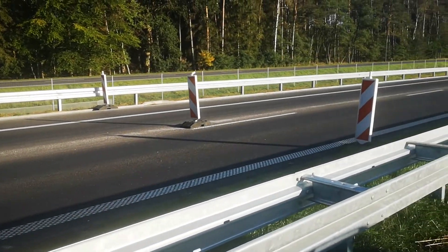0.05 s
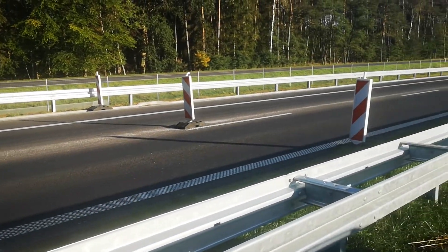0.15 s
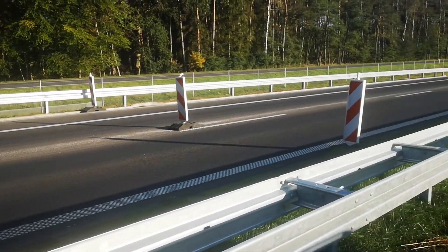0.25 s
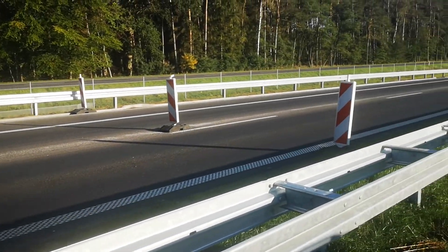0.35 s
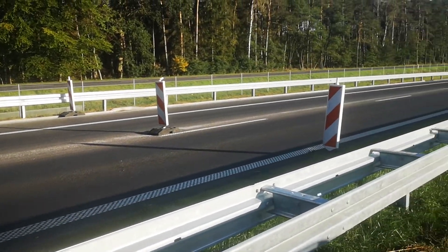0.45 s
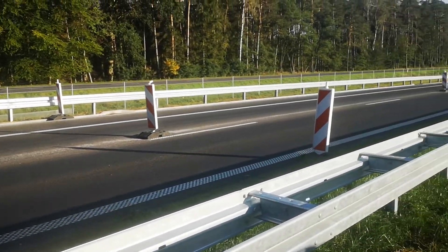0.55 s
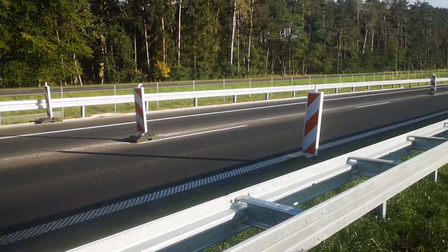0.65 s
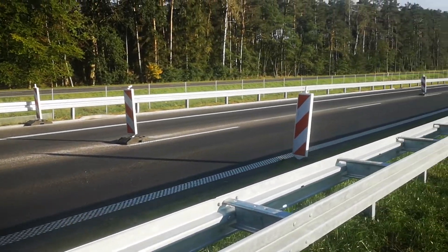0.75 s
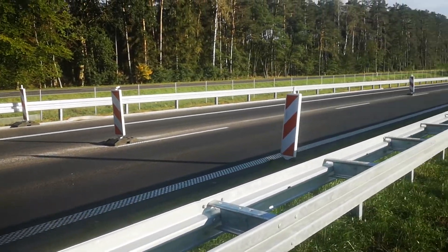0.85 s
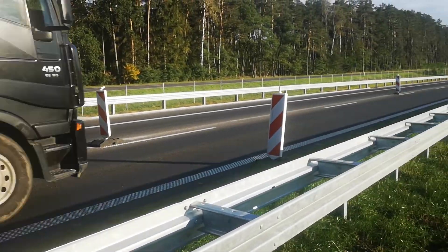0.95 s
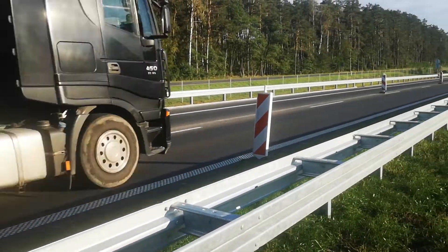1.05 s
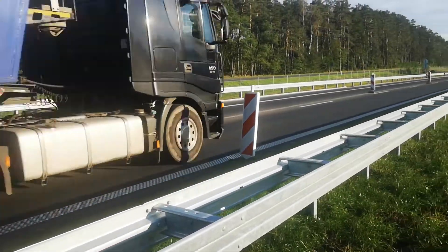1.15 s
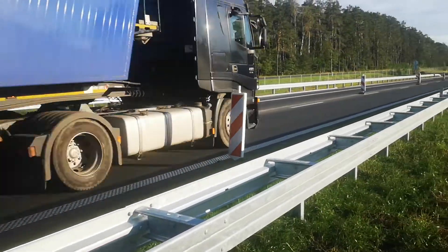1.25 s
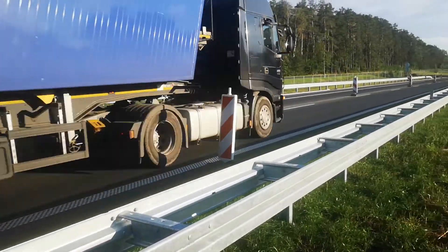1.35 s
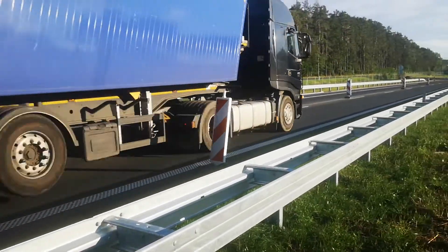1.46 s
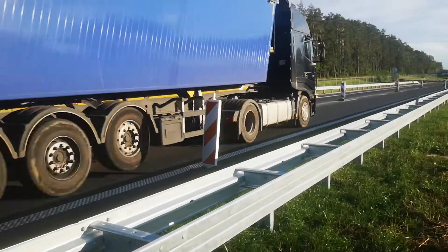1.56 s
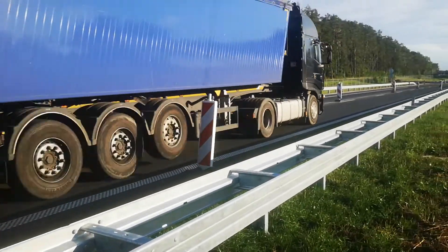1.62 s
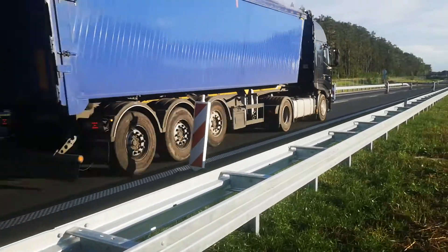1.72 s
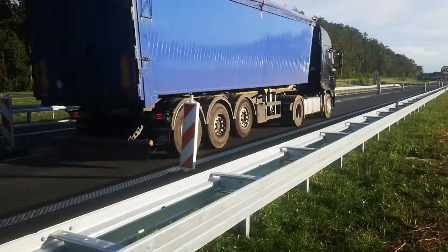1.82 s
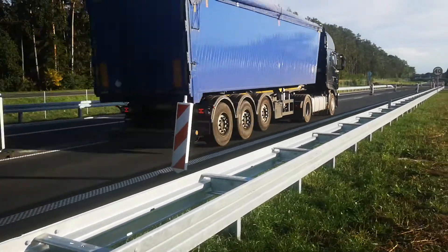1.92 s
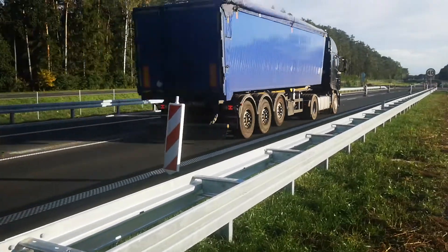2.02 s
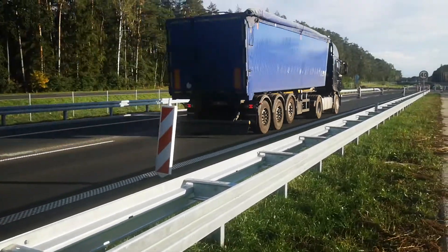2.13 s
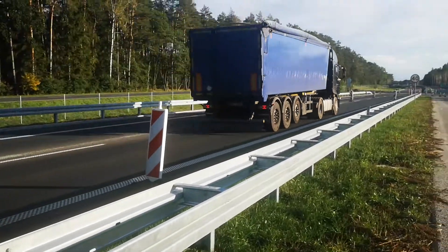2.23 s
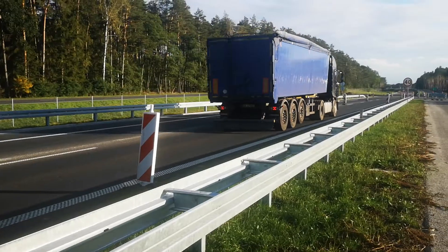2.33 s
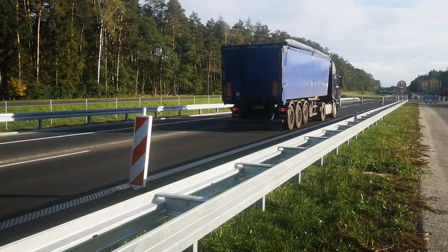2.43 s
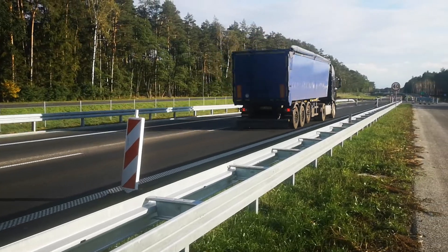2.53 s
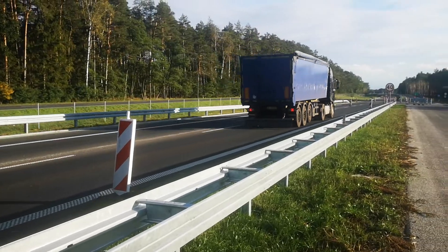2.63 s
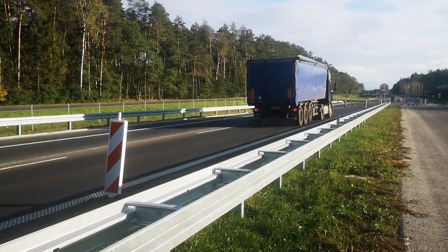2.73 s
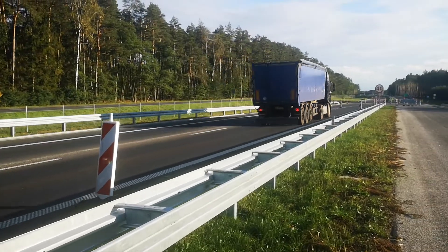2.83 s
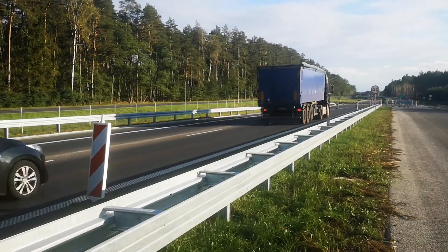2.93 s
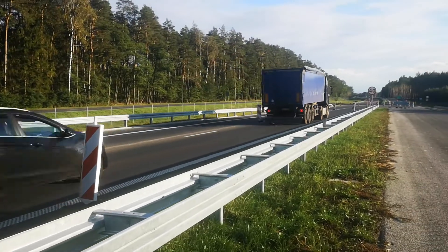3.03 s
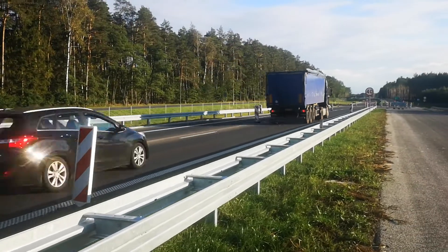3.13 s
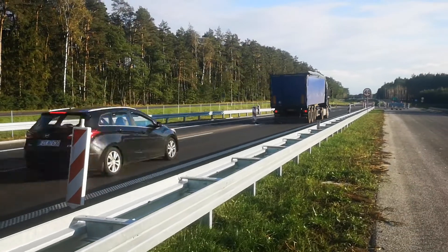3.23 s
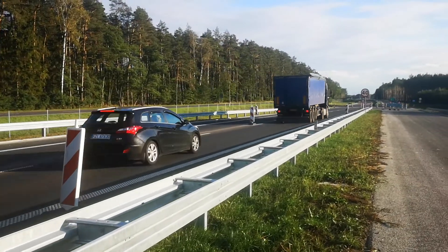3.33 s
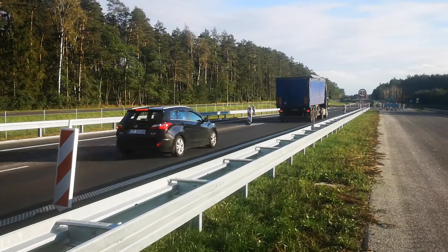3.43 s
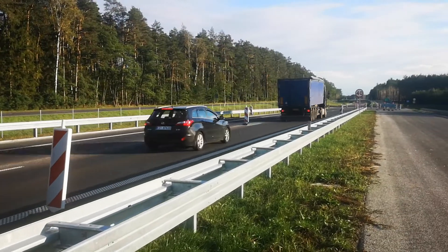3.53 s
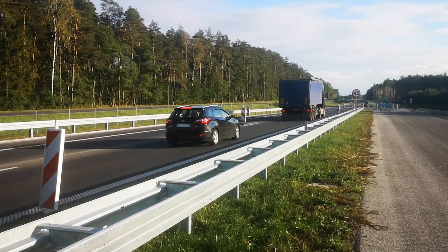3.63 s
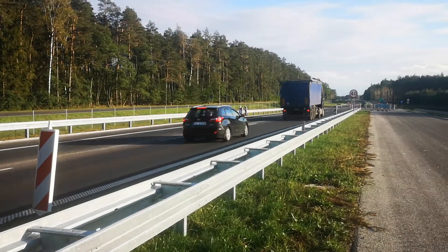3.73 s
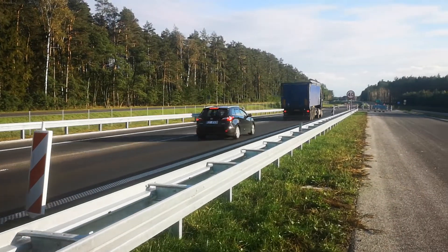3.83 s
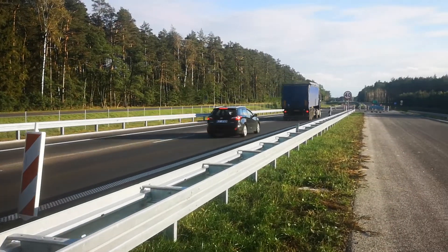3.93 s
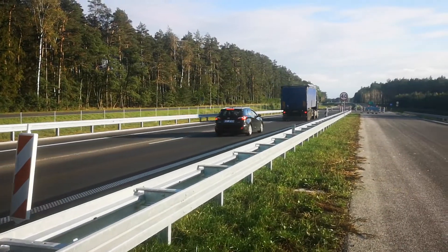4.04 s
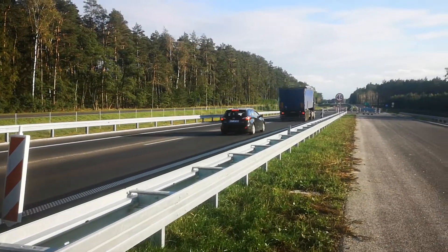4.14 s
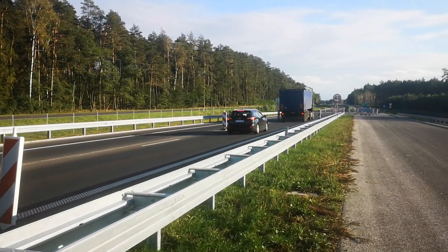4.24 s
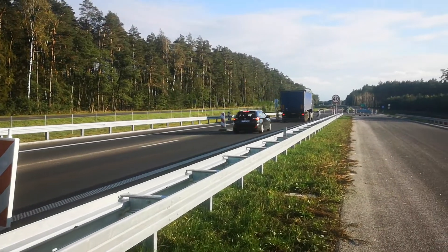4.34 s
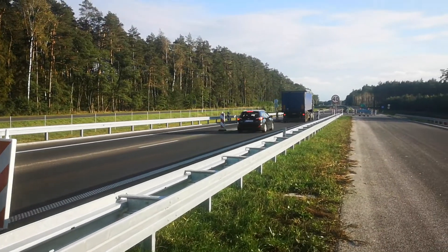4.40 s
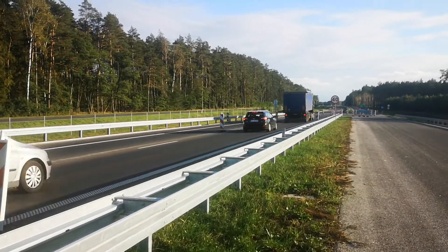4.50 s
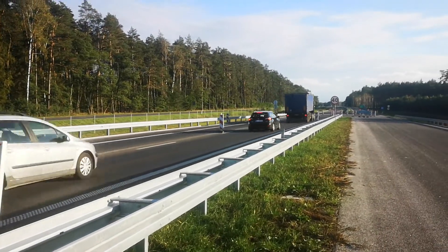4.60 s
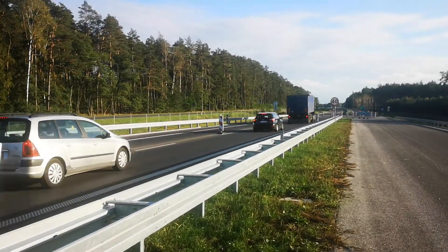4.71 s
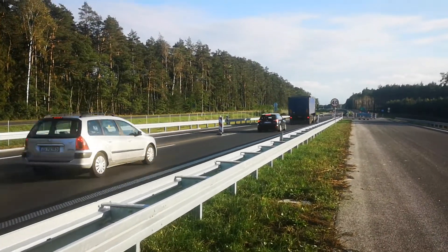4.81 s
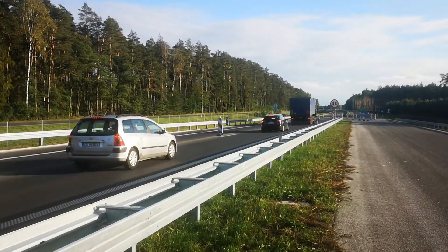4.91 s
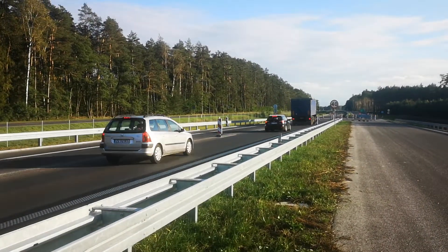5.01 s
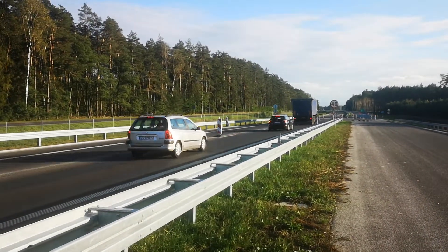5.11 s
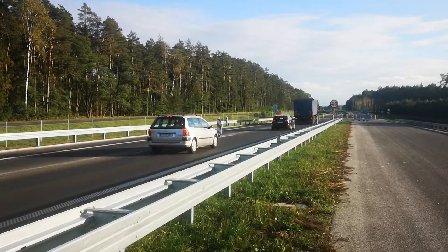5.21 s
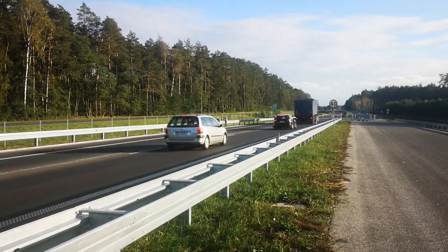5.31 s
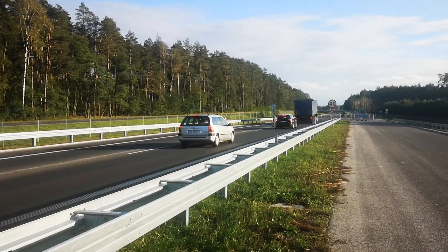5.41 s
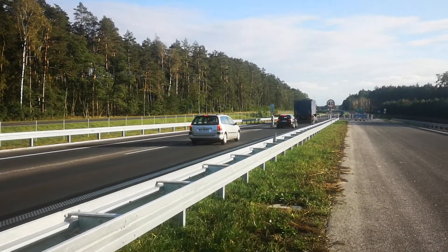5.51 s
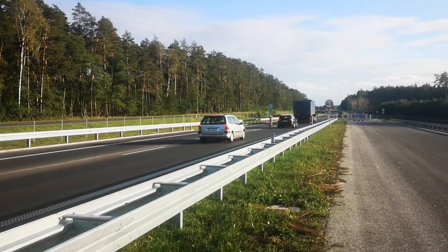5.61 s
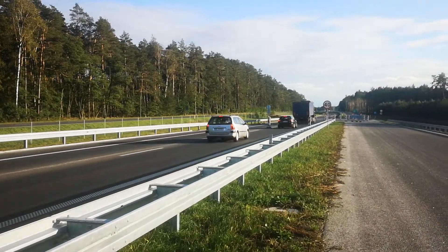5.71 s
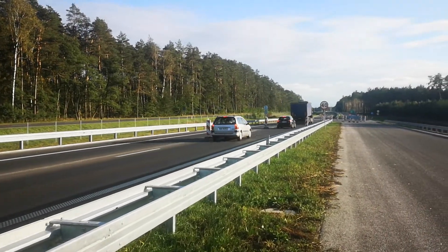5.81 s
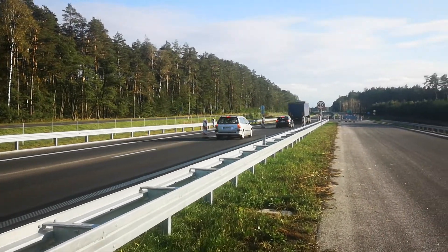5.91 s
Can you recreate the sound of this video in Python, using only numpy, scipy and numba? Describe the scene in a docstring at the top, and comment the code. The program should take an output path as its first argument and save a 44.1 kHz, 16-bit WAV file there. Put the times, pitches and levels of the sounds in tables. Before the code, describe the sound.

Roadside traffic passing left to right: a heavy lorry first, then two quicker car whooshes, over a distant wash of road noise.

```python
"""First comes the roar of a lorry drawing near on an expressway, over the wash of traffic far down the road.
The lorry and two cars pass left to right and one more draws near, a few metres from a hand-held phone
behind the crash barrier. Tyres are shaped noise that falls in pitch as they pass; engines drone in
wavering tones, a turbo whistles, and the forest edge scatters the passing sounds back as fading noise.
Each microphone port rings in certain directions; the hand ticks and rustles on the case."""
import sys
import numpy as np
from scipy import signal
from scipy.fft import rfft, irfft, next_fast_len
from scipy.io import wavfile
from scipy.ndimage import uniform_filter1d, map_coordinates
from numba import njit

SR = 44100
rng = np.random.default_rng(int(sys.argv[2]) if len(sys.argv) > 2 else 0)


def persist_wave(psi):
    """Save psi, clipped to +-1, as 16-bit WAV."""
    counts = np.round(np.clip(psi, -1, 1) * 32767).astype(np.int16)
    wavfile.write(sys.argv[1], SR, np.atleast_2d(counts).T)


N = 262836
T = np.arange(N) / SR  # time, s
SOUND_SPEED = 343  # m/s

# traffic far down the road, relative colour at each port: (f/Hz, left level/dB, right level/dB)
FAR_COLOUR = [(450, -50, -47), (615, -22.5, -11.5), (957, -6, 0), (1170, -10, -17.5), (1580, -12, 4),
              (1900, -15, -4.5), (2190, -5, 2.5), (2510, -14.5, -17), (5050, -31, -72), (7660, -33, -26),
              (8850, -54, -40), (14000, -52, -45.5)]
FAR_DB, FAR_LEAD_MS = -36, 0.18
FAR_ALIKE = 0.51  # share of the power common to both ports

# wheel sets and the lorry's engine block: (abreast t/s, speed/(m/s), lane distance/m,
# plain roar level at 1 m/dB, level tilt from front to behind/dB, hump f/Hz, hump width/share of f,
# hump level/dB, hiss level/dB)
WHEELS = [(.86, 22, 7, -16.5, 1, 860, 0.44, 2.5, 6), (.95, 22, 7, -24.5, -4, 384, 0.43, 22, 3),
          (1.12, 22, 7, -17, 0, 658, 0.16, 14, -4.5), (1.5, 21, 7, -16, 0.5, 807, 0.2, 10.5, -4.5),
          (2.75, 22, 6.5, -18, -1, 2180, 0.4, 5.5, 2), (4.24, 21, 6.5, -16, -2, 2280, 0.1, -17.5, 0),
          (6.7, 21, 7, -19, 9, 1960, 0.39, 7, -8)]
# colour of tyre roar before hump and hiss are set: (f/Hz, level/dB)
TYRE_COLOUR = [(150, -40), (300, -12), (450, -4.5), (700, -4.5), (1000, -1), (2000, -2.5), (3200, -7),
               (5000, -14), (8000, -19), (16000, -38)]
# share of a roar's power that differs from port to port: (f/Hz, share/0-1)
PORT_SPREAD = [(600, 0), (1200, 0.17), (2000, 0.03), (4000, 0.83), (8000, 1)]
AIR_HZ_M = 143000  # treble edge times distance
SHADE_DB = -3  # shift of that edge by the time a vehicle is straight behind

# ports on the phone: the left one hears passing sounds first, most so from the lead bearing
LEAD_MS, LEAD_SWING_MS, LEAD_BEARING_DEG = .24, 0.23, -41.5

# body, exhaust and road rumble of each vehicle:
# (boom and deep loudest t/s, boom level/dB, growl level/dB, deep level/dB)
RUMBLES = [(.7, -30.5, -33.5, -33.5), (2.8, -44, -41.5, -33.5), (4.35, -47.5, -41, -33)]
# loss per doubled distance: (boom/dB, growl/dB, deep/dB)
RUMBLE_FALL_DB = [3, 4.5, 4]
GROWL_LAG_S = 0.38  # the exhaust passes last
GROWL_LEAD_MS = 0.55  # the left port hears the growl first while its vehicle draws near

# engines: (abreast t/s, firing f/Hz, sag/(Hz per s), firing tone level abreast/dB,
# extra level from behind/dB, loss per doubled distance/dB, level shift of the multiples/dB)
ENGINES = [(1.05, 55.5, 1.1, -34.5, 1.5, 1.6, 3), (2.75, 58.5, 1, -40, -5, 9, -6),
           (4.2, 56.3, 2, -31, -3, 8, -8)]
# multiples of the firing rate: (multiple/count, level before the engine's shift/dB)
MULTIPLES = [(2, -16.5), (3, -15), (4, -12)]
SPEED_M_S, LANE_M = 22, 7  # path of the engines and rumbles

# turbo of the lorry: (abreast t/s, speed/(m/s), lane distance/m, whistle f before Doppler/Hz)
TURBO = (.9, 21, 7, 6730)
# turbo as each port catches it: (t/s, left level at 1 m/dB, right level at 1 m/dB)
WHISTLE = [(0, -33, -31), (.5, -36, -36), (.6, -36, -33), (.82, -34, -47), (.91, -10, -19),
           (1.02, -15, -38), (1.27, -22, -32), (1.33, -50, -50)]
INTAKE_HZ, INTAKE_DB = 9450, -10  # hiss of the air intake, under the whistle

# throb of the trailer's air wake: (strongest t/s, f/Hz, glide/(Hz per s), half length/s, level/dB)
WAKE = (1.2, 27, -10, .33, -29)
# a gust hits both ports: (t/s, f/Hz, half length/s, envelope peak level/dB)
THUD = (4.509, 50, .016, -18)

# ticks of fingers and grit on the case, before it rings: (t/s, level/dB, left minus right level/dB)
TICKS = [(1.1666, -27, 4), (2.032, -27, -12), (3.56, -33, -8), (3.6081, -30, -5), (4.0129, -15.5, -24),
         (5.3364, -40, -11), (5.3953, -41, -15), (5.4164, -43, -21), (5.52, -36, -11), (5.5835, -39, -5)]
# the hand slides on the case: (t/s, level before the split between ports/dB)
SLIDE = [(5.18, -83), (5.224, -56), (5.238, -62), (5.31, -53), (5.318, -44), (5.388, -50), (5.402, -43.5),
         (5.432, -56), (5.444, -50), (5.498, -55), (5.518, -49), (5.564, -54), (5.578, -74), (5.584, -51),
         (5.596, -73), (5.62, -76)]
# full colour of the ringing case: (f/Hz, level/dB)
CASE_COLOUR = [(1200, -18), (2100, -8), (3300, 0), (5500, 2.5), (6700, 3), (7700, 19), (8800, 2.5),
               (12000, -3), (15500, -13)]
TICK_RING, SLIDE_RING = 0.39, 0.77  # shares of the case's dB

FOREST_T60_S, FOREST_DB = 0.91, -6
# port resonances open to one direction: (port/0 left 1 right, f/Hz, glide/(Hz per deg), width/Hz,
# level/dB, bearing/deg, spread before that bearing/deg, spread after it/deg)
LOBES = [(1, 6950, 7, 1140, 13.5, -40, 16.2, 22.7), (1, 2010, 1, 410, 4, -24, 31, 16.4),
         (1, 2640, -20.5, 490, 3, -59, 9.1, 33), (1, 10100, 7, 3100, 3.5, -33, 32, 11),
         (0, 7700, -4, 580, 5.5, 13, 33, 57), (0, 1830, -3, 130, 5.5, -27, 28, 38),
         (0, 1030, -1, 210, -2.5, 25, 18, 34), (1, 1090, -13, 350, -4.5, 25.5, 13, 19),
         (0, 3200, 2, 930, 5, 60, 20, 11), (1, 900, 5, 860, 0, -44, 11.4, 13),
         (1, 3450, 13, 610, -1, 60.5, 17, 10), (0, 560, 0, 1000, -3, -52, 20, 38),
         (1, 5100, 12, 1400, 7, -52, 17, 18), (0, 3700, -3, 360, 2, -47, 9.8, 21)]
# overall colour of the microphone ports: (f/Hz, left level/dB, right level/dB)
PORT_COLOUR = [(308, -5.5, 6), (416, -7, -1), (510, -5.5, -6), (803, 1.5, -1.5), (1330, -4.5, 2),
               (1500, 0.5, 3), (2390, -3.5, 4), (2765, -6, 8), (3430, -10, 0.5), (4540, -9.5, -8.5),
               (5700, -8.5, -1), (7500, -4, 0.5), (8200, -8, -5.5), (10900, -18.5, -8), (15500, -17, -14)]
# how far the left port's phase runs ahead of the plain time lead: (f/Hz, phase/deg)
LEFT_PHASE = [(200, 0), (320, 11), (480, 54), (600, 47), (780, 24), (1100, -29), (1400, -81), (1650, -24),
              (2500, 17), (4000, -3)]
TOP_HZ = 15400


def undb(db):
    """Turn dB into gain."""
    return 10 ** (np.asarray(db) / 20)


def unit(x):
    """Scale a sound to an average (rms) strength of 1."""
    return x / np.sqrt(np.mean(x ** 2))


def colour(x, hz, db, turn=((1, 0), (2, 0))):
    """Shape a spectrum by points joined on a log-frequency axis; turn shifts the phase, as (f/Hz, deg)."""
    size = next_fast_len(len(x))
    log_hz = np.log(np.maximum(np.arange(size // 2 + 1) * SR / size, 1))
    turn_hz, turn_deg = np.transpose(turn)
    phase = np.radians(np.interp(log_hz, np.log(turn_hz), turn_deg))
    gain = undb(np.interp(log_hz, np.log(hz), db))
    return irfft(rfft(x, size) * gain * np.exp(1j * phase), size)[:len(x)]


@njit
def svf(x, hz, damping):
    """State-variable filter with a moving centre: returns band (gain 1) and low outputs."""
    band, low = np.empty(len(x)), np.empty(len(x))
    b, l = 0., 0.
    for i in range(len(x)):
        g = np.tan(np.pi * hz[i] / SR)
        v = (b + g * (x[i] - l)) / (1 + g * (g + damping))
        band[i], low[i] = damping * v, l + g * v
        b, l = 2 * v - b, l + 2 * g * v
    return band, low


def walk(rate):
    """Slow random wander: levels held 1 / rate s, then smoothed twice; spread near 1."""
    hold = int(SR / rate)
    steps = np.repeat(rng.standard_normal(N // hold + 1), hold)
    return 1.436 * uniform_filter1d(uniform_filter1d(steps, hold), hold)[:N]


def read_at(sound, at):
    """Read a sound at moving, fractional sample positions."""
    return map_coordinates(sound, [at], order=2, mode="mirror")


def far_road():
    """A steady wash of coloured noise that swells a little; the ports share part of it."""
    common, left, right = rng.standard_normal((3, N))
    late = np.roll(common, int(FAR_LEAD_MS * SR / 1000))
    hz, *port_db = np.transpose(FAR_COLOUR)
    wash = []
    for shared, own, db in zip((common, late), (left, right), port_db):
        wash.append(colour(np.sqrt(FAR_ALIKE) * shared + np.sqrt(1 - FAR_ALIKE) * own, hz, db))
    return unit(np.array(wash)) * undb(FAR_DB + .6 * walk(2))


def passing(sounds, abreast, speed, lane, behind_db):
    """A moving source at both ports: travel time (so Doppler), spreading, air loss; also its bearing."""
    along = speed * (T - abreast)
    far, bearing = np.hypot(along, lane), np.degrees(np.arctan2(along, lane))
    swing = np.cos(np.radians(bearing - LEAD_BEARING_DEG))
    lead = SR / 1000 * (LEAD_MS + LEAD_SWING_MS * swing)
    sent = SR * (T - far / SOUND_SPEED)  # sample that left the source
    gain = undb(behind_db * bearing / 90) / far
    shade = undb(SHADE_DB * np.maximum(bearing, 0) / 90)
    edge = np.clip(AIR_HZ_M / far * shade, 500, .4 * SR)
    arrived = [read_at(sound, at) for sound, at in zip(sounds, (sent, sent - lead))]
    return np.array([gain * svf(x, edge, 0.92)[1] for x in arrived]), bearing


def tyres():
    """Wheel sets as noise with a wandering hump and hiss, each as (sound at the ports, bearing)."""
    heard = []
    hz, share = np.transpose(PORT_SPREAD)
    share = np.clip(share, .01, .99)
    for abreast, speed, lane, db, behind_db, hump_hz, width, hump_db, hiss_db in WHEELS:
        left, other = rng.standard_normal((2, N))
        # many tyres and body panels: the short waves differ from port to port
        right = colour(left, hz, 10 * np.log10(1 - share)) + colour(other, hz, 10 * np.log10(share))
        waver = undb(db + .6 * walk(12))  # road texture
        flicker = undb(hiss_db + .5 * walk(30))  # grit under the treads
        hump = hump_hz * (1 + .03 * walk(5))  # tread resonance wanders
        swell = undb(hump_db + 1.2 * walk(11))
        roars = []
        for noise in (left, right):
            roar = unit(colour(noise, *np.transpose(TYRE_COLOUR)))
            body = svf(roar, np.full(N, 4500.), 1.23)[1]
            hiss = flicker * (roar - body)
            roars.append(waver * (body + hiss + swell * svf(roar, hump, width)[0]))
        heard.append(passing(roars, abreast, speed, lane, behind_db))
    return heard


def doublings(abreast):
    """How often the abreast distance has doubled; also the sine of the bearing."""
    along = SPEED_M_S * (T - abreast)
    far = np.hypot(along, LANE_M)
    return np.log2(far / LANE_M), along / far


def rumble(column, lag):
    """Gain of one rumble band: the powers of all vehicles add."""
    power = 0
    for row in RUMBLES:
        steps, _ = doublings(row[0] + lag)
        power = power + undb(row[column + 1] - RUMBLE_FALL_DB[column] * steps) ** 2
    return np.sqrt(power)


def nearing():
    """Share of the growl counted as drawing near, fading out around each pass."""
    powers, sides = [], []
    for row in RUMBLES:
        steps, side = doublings(row[0] + GROWL_LAG_S)
        powers.append(undb(row[2] - RUMBLE_FALL_DB[1] * steps) ** 2)
        sides.append(np.clip(.6 - 1.5 * side, 0, 1))
    return np.sum(np.array(powers) * sides, axis=0) / np.sum(powers, axis=0)


def low_rumble():
    """Boom, growl and deep noise bands: long waves reach both ports almost alike."""
    boom = unit(colour(rng.standard_normal(N), [30, 75, 120, 170, 400], [-60, -1, 0, -2, -90]))
    growl = unit(colour(rng.standard_normal(N), [80, 200, 300, 400, 900], [-60, 0, -5, -14, -90]))
    deep = unit(colour(rng.standard_normal(N), [8, 25, 50, 66, 160], [-40, -5, 0, -3, -90]))
    boom_gain, deep_gain = rumble(column=0, lag=0), rumble(column=2, lag=0)
    growl_gain = rumble(column=1, lag=GROWL_LAG_S)
    early = read_at(growl, np.arange(N) + GROWL_LEAD_MS * SR / 1000 * nearing())
    steady = boom * boom_gain + np.array([early, growl]) * growl_gain + deep * deep_gain
    # the ports differ a little: noise from 1 s earlier, with opposite sign at each port
    apart = 0.083 * np.roll(growl, SR) * growl_gain
    apart += 0.12 * np.roll(boom, SR) * boom_gain
    apart += 0.1 * np.roll(deep, SR) * deep_gain
    return steady + np.array([apart, -apart])


def drone(abreast, hz, sag, db, behind_db, fall_db, multiples_db):
    """Engine firing tone with wavering multiples; it drops as the engine passes and eases off."""
    steps, side = doublings(abreast)
    hz = (hz - sag * (T - abreast)) * (1 - side * SPEED_M_S / SOUND_SPEED)  # Doppler
    phase = 2 * np.pi * np.cumsum(hz * (1 + .012 * walk(11))) / SR
    tone = np.sin(phase) * undb(2.5 * walk(11))
    for multiple, order_db in MULTIPLES:
        level = undb(multiples_db + order_db + 0.92 * walk(5))
        tone = tone + level * np.sin(multiple * phase + 1.24 * walk(6))
    return np.sqrt(2) * tone * undb(db + behind_db * side - fall_db * steps + 1.5 * walk(5))


def turbo():
    """An unsteady whistle over intake hiss, as (sound at the ports, bearing)."""
    abreast, speed, lane, hz = TURBO
    s, *port_db = np.transpose(WHISTLE)
    hiss = svf(rng.standard_normal(N), np.full(N, 1. * INTAKE_HZ), 0.55)[0]
    intake = undb(INTAKE_DB) * unit(hiss)
    phase = 2 * np.pi * np.cumsum(hz * (1 + .002 * walk(60))) / SR
    whistle = undb(3.5 * walk(25)) * np.sin(phase)
    sounds = [undb(np.interp(T, s, db)) * (whistle + intake) for db in port_db]
    return passing(sounds, abreast, speed, lane, 0.)


def forest(sound):
    """Trees scatter sound back as many random echoes that die away."""
    lag = np.arange(SR) / SR
    trees = rng.standard_normal(SR) * np.exp(-np.log(1000) * lag / FOREST_T60_S)
    trees /= np.sqrt(np.sum(trees ** 2))
    # the road was already sounding, so the trees answer from the start
    lead_in = SR // 4
    earlier = np.concatenate([sound[lead_in:0:-1], sound])
    return undb(FOREST_DB) * signal.fftconvolve(earlier, trees)[lead_in:][:N]


def lobe(sound, bearing, hz, glide, width_hz, gain_db, aim, opening, closing):
    """A port resonance that sounds while a source crosses one direction, gliding with its bearing."""
    off = bearing - aim
    facing = np.exp(-np.where(off < 0, (off / opening) ** 2, (off / closing) ** 4))
    centre = hz + glide * np.clip(off, -40, 40)
    return undb(gain_db) * svf(sound * facing, centre, width_hz / hz)[0]


def hand():
    """Sharp ticks and grainy slides ring the case, mostly at the right port."""
    hz, db = np.transpose(CASE_COLOUR)

    def ring(pair, share):
        """The case boosts some pitches and dulls others."""
        return np.array([colour(x, hz, share * db) for x in pair])

    ticks = np.zeros((2, N))
    tail = np.arange(90)  # samples
    for s, tick_db, pan_db in TICKS:
        snap = 0.12 * rng.standard_normal(90) * np.exp(-tail / 10.0)
        tick = snap - np.exp(-((tail - 3) / 0.99) ** 2)
        at = int(s * SR)
        ticks[:, at:at + 90] += np.outer(undb(tick_db + np.array([pan_db, -pan_db]) / 2), tick)
    grip = uniform_filter1d(np.repeat(rng.exponential(size=N // 40 + 1), 40)[:N], 30)
    slide_db = np.interp(T, *np.transpose(SLIDE), left=-120, right=-120)
    press = undb(slide_db + 2.2 * walk(90))  # stick and slip
    rub = unit(ring(rng.standard_normal((2, N)) * undb(1.7 * grip), SLIDE_RING))
    return ring(ticks, TICK_RING) + rub * press * undb(np.array([[-9], [5]]))


def wake():
    """Air behind the trailer throbs: a gliding low tone that swells and fades."""
    s, hz, glide, length, db = WAKE
    since = T - s
    throb = np.sin(2 * np.pi * (hz + glide * since / 2) * since)
    return np.sqrt(2) * undb(db) * np.exp(-(since / length) ** 2) * throb


def thud():
    """A gust pushes both ports alike: a short low wave."""
    s, hz, length, db = THUD
    return undb(db) * np.sin(2 * np.pi * hz * (T - s)) * np.exp(-((T - s) / length) ** 2)


def scene():
    """Traffic, its forest scatter and port lobes, plus far road, low sounds and hand."""
    heard = tyres() + [turbo()]
    air = sum(sound for sound, _ in heard)
    for port in range(2):
        air[port] += forest(air[port])
    for port, *resonance in LOBES:
        for sound, bearing in heard:
            air[port] += lobe(sound[port], bearing, *resonance)
    hz, left_db, right_db = np.transpose(PORT_COLOUR)
    traffic = np.array([colour(air[0], hz, left_db, LEFT_PHASE), colour(air[1], hz, right_db)])
    low = low_rumble() + sum(drone(*engine) for engine in ENGINES) + wake() + thud()
    return far_road() + traffic + low + hand()


def record(dry):
    """The phone steeply cuts everything above its top frequency."""
    return signal.sosfilt(signal.ellip(10, .2, 80, TOP_HZ, fs=SR, output="sos"), dry)


dry = scene()
out = record(dry)
persist_wave(out)
```